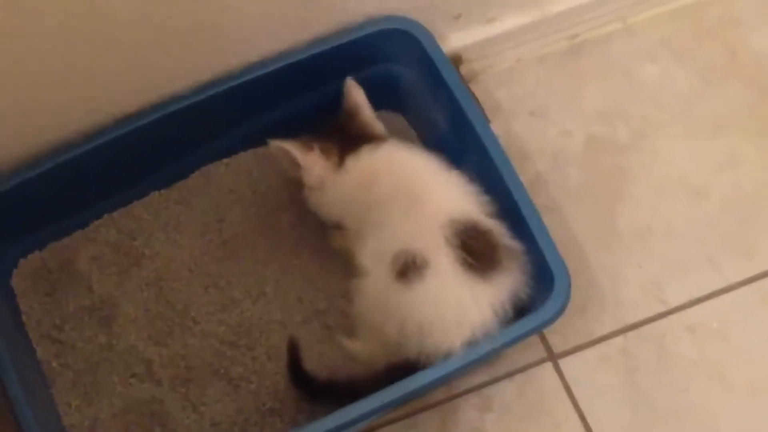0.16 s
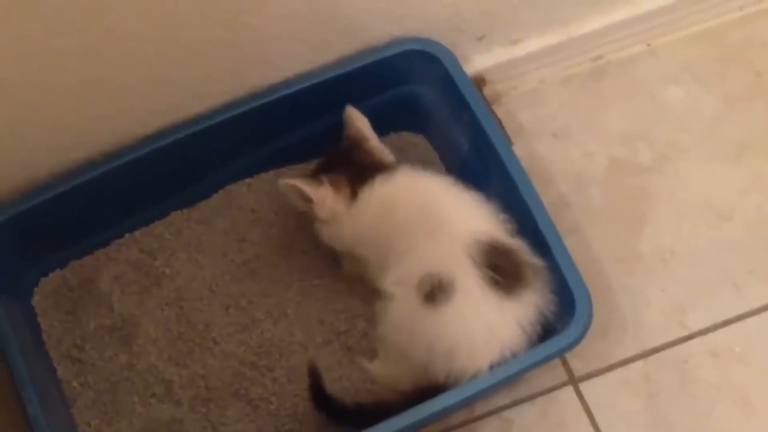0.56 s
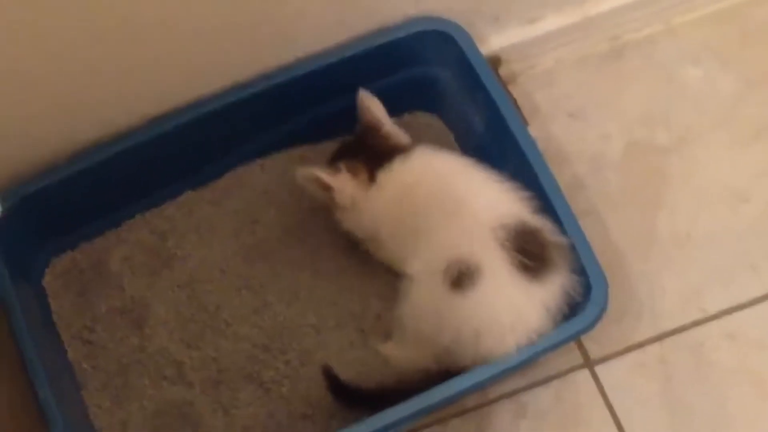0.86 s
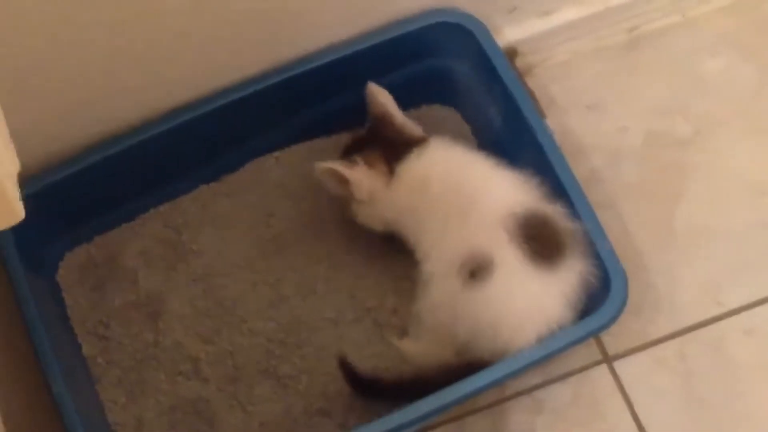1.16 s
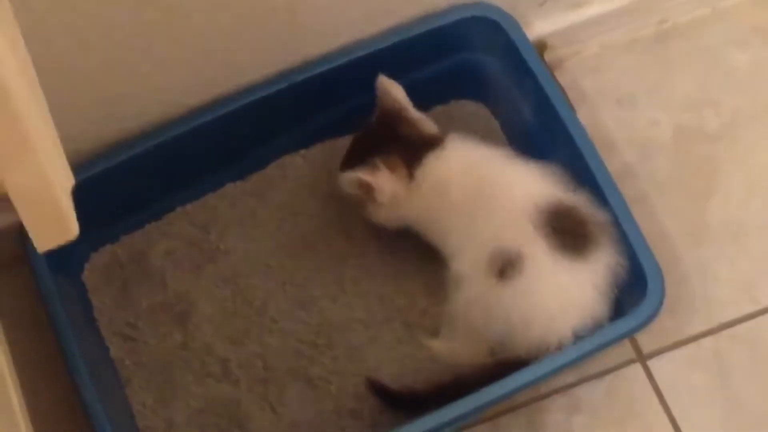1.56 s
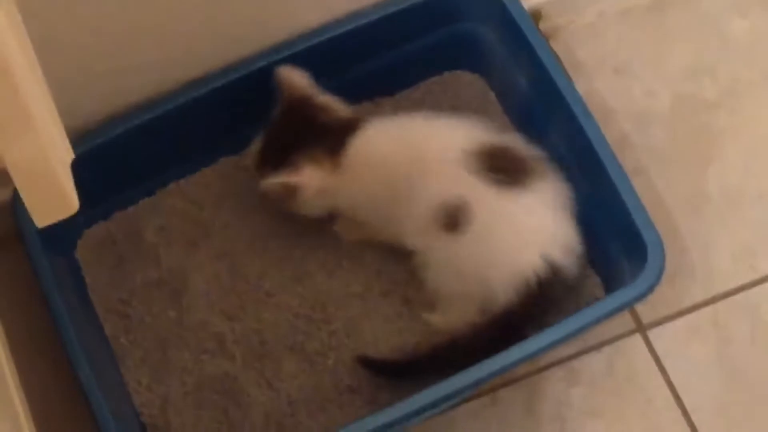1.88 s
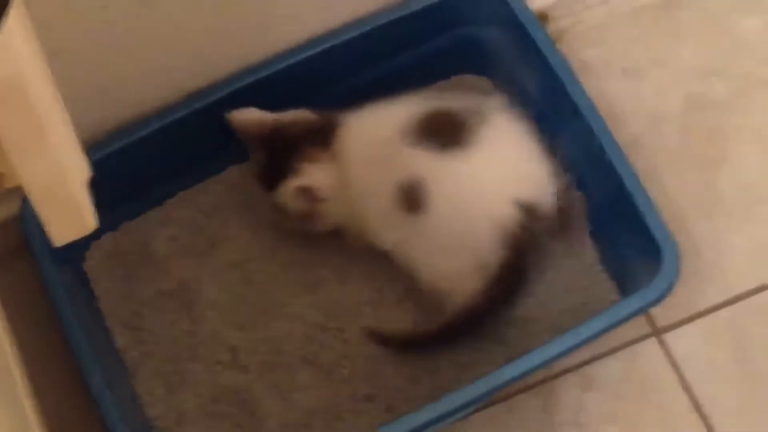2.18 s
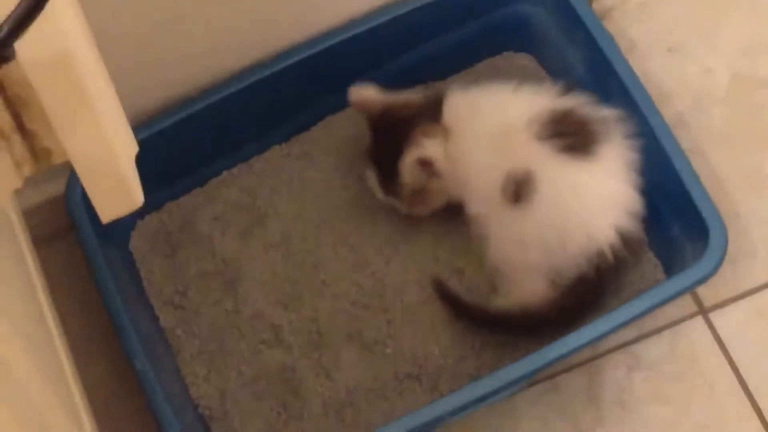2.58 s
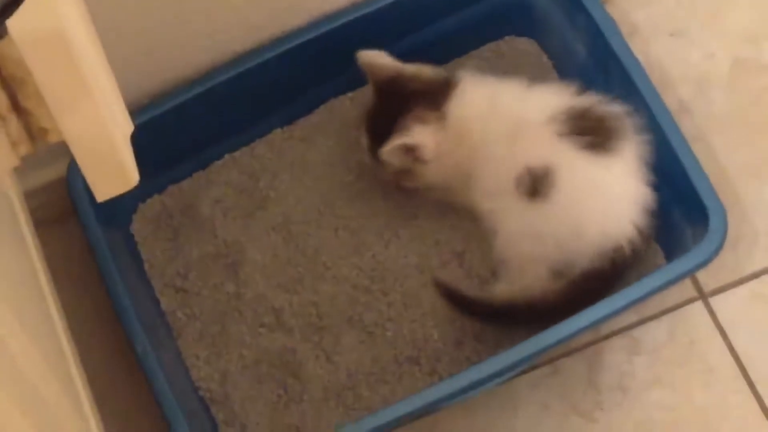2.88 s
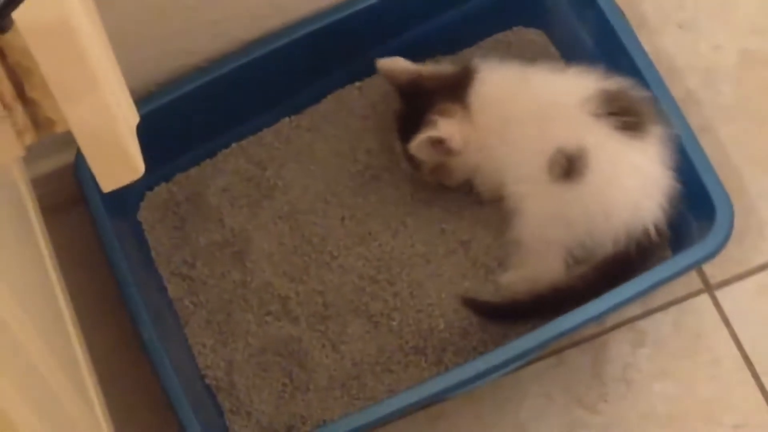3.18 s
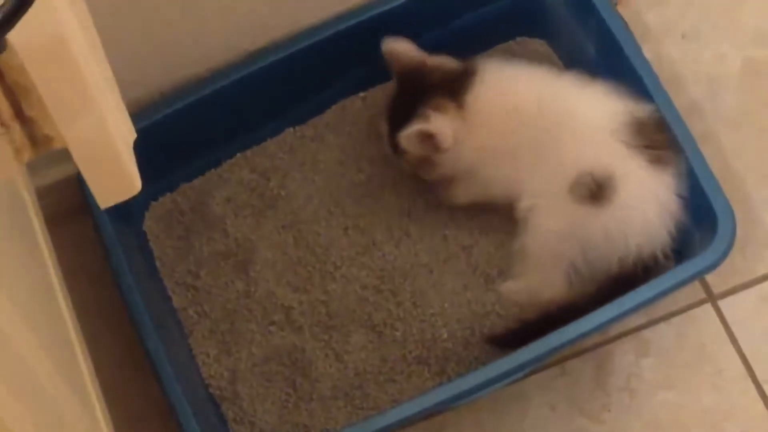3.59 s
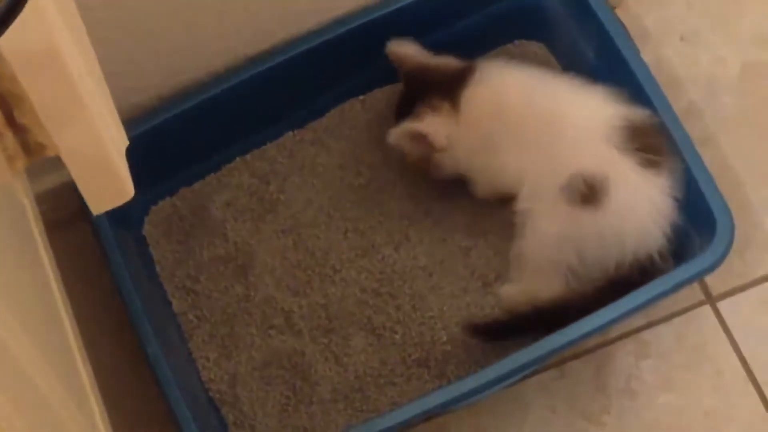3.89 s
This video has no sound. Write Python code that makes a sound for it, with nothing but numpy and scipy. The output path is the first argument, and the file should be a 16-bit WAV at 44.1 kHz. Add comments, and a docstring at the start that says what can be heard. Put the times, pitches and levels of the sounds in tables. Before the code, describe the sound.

Dry clay granules crunch and scatter under fast small paws, rattling the plastic tray. The digging stops briefly while loose litter trickles and brushes softly, then resumes with duller, more spaced strokes and a few knocks. An appliance hums low throughout; the microphone is about a metre away, with slight hiss and little reverberation.

```python
"""Kitten digging in clay litter

A kitten digs in a plastic tray on a tiled floor, heard from about a metre above.
Each paw stroke is a shower of random grain clicks, which also excite the modes of the tray;
loose grains trickle between strokes, soft swishes brush the dust, and knocks and ticks stand out.
A mains-driven appliance hums as a sine over the shaped noise of room rumble and microphone hiss."""
import sys
import numpy as np
from scipy import signal
from scipy.fft import rfft, irfft
from scipy.io import wavfile
from scipy.ndimage import uniform_filter1d

SR = 44100
rng = np.random.default_rng(int(sys.argv[2]) if len(sys.argv) > 2 else 0)


def master_out(mix):
    """Clip the mix to full scale and print it as 16-bit PCM to the path in sys.argv[1]."""
    frames = np.transpose(np.atleast_2d(mix))
    ceiling = np.clip(frames, -1, 1)
    pcm = np.round(ceiling * 32767).astype(np.int16)
    wavfile.write(sys.argv[1], SR, pcm)


N = 178119
T = np.arange(N) / SR  # time [s]

# Paw strokes; positive brightness skims the dusty top, negative digs to the tray floor:
# (time [s], relative strength [dB], brightness [dB], length [s])
PAW_STROKES = [(0.0357, -47.5, -1.5, 0.031), (0.163, -58, -4, 0.027), (0.246, -49.5, -4.5, 0.024),
               (0.3476, -58.5, -9, 0.026), (0.394, -54, 1.5, 0.013), (0.4306, -48, 2, 0.021),
               (0.526, -56.5, 1.5, 0.017), (0.5554, -59, 1, 0.018), (0.6324, -51, -1, 0.03),
               (0.786, -60, 3.5, 0.023), (0.8196, -47, -2, 0.027), (0.894, -54.5, 4, 0.021),
               (0.95, -51.5, 2.5, 0.017), (1.0216, -49.5, 3, 0.046), (1.1084, -60, -3, 0.02),
               (1.1674, -57, -1, 0.014), (1.2476, -50.5, 1, 0.054), (1.3784, -58, 5, 0.047),
               (1.435, -52.5, 3, 0.057), (1.493, -55.5, 2, .023), (1.609, -55.5, 1.5, 0.011),
               (1.683, -51, -1, .059), (1.846, -59, 3, 0.0079), (2.445, -56, -7, 0.04),
               (2.7354, -48, -6.5, 0.035), (2.8873, -59.5, -9, 0.12), (2.9654, -56, -3.5, 0.046),
               (3.2113, -49, -1, 0.049), (3.335, -54, -2.5, .021), (3.3643, -54, -3, 0.027),
               (3.4494, -55, -3, 0.013), (3.5364, -59.5, 2.5, 0.034), (3.571, -51, -2.5, 0.022),
               (3.713, -49, -5, 0.043), (3.7564, -60, 1, .03), (3.837, -58.5, 3.5, 0.018),
               (3.8995, -63, 6.5, 0.025), (3.931, -49.5, 0, 0.02)]
# Soft swishes over the dusty surface as the kitten turns:
# (time [s], relative strength [dB], brightness [dB], length [s])
SURFACE_SWISHES = [(2.206, -57, -2.5, .065), (2.275, -59, 3.5, 0.061)]
# Loose litter sliding under the body: (time [s], relative crunch level [dB])
SLIDING_LITTER = [(0.0, -60), (1.06, -56.5), (1.26, -62.5), (1.63, -55), (1.81, -67), (2.1, -64),
                  (2.38, -55), (2.53, -67.5), (2.78, -75.5), (2.9, -55.5), (3.04, -83), (3.26, -59),
                  (3.41, -59.5), (4.04, -60)]
# Colour of the clay grains by the pitch they click at: (frequency [Hz], relative level [dB])
GRAIN_COLOUR = [(900, -11.5), (1200, -9), (1500, -5.5), (2000, -1.5), (2500, -6.5), (3300, 1), (4000, 0.5),
                (5200, -2.5)]
# Colour of dust skittering on top: (frequency [Hz], relative level [dB])
DUST_COLOUR = [(4200, -17.5), (5200, 2.5), (5700, 0.5), (8000, 1), (10000, -5), (12500, -12.5),
               (15600, -12)]
# Colour of the finest dust thrown up: (frequency [Hz], relative level [dB])
SPRAY_COLOUR = [(7000, -18), (10000, 5), (13000, 5), (15600, -6)]
# Modes of the plastic tray: (frequency [Hz], width [Hz], relative level [dB])
TRAY_MODES = [(517, 57, -9.5), (595.3, 28, 0), (669.5, 23.5, -1), (827, 56, -1.5), (895, 16, -7),
              (1094, 19, -8), (1264, 24, -4.5), (1745, 74, -5), (1913, 21, -5.5), (1992, 53, -5),
              (2075, 21, -17), (2217, 32, -3.5), (2451, 42, -1.5), (2457, 44, -14), (3676, 17, -9),
              (4090, 73, -9.5)]
# Lumps and claws knocking the tray: (time [s], peak level [dB], frequency of the nearest modes [Hz])
TRAY_KNOCKS = [(0.059, -54, 1260), (.44, -51, 2500), (.562, -51, 650), (.672, -54.5, 624),
               (.87, -55.5, 595), (.905, -51.5, 1880), (1.055, -52, 600), (1.125, -59, 2415),
               (1.175, -58, 2470), (1.498, -53, 580), (1.51, -51, 910), (1.613, -55, 580), (2.74, -53, 840),
               (2.755, -47, 580), (2.76, -56, 1260), (3.24, -46, 1930), (3.34, -55, 1880),
               (3.75, -51.5, 590)]
# Single grains flicked against the wall: (time [s], peak level [dB], colour centre [Hz])
WALL_TICKS = [(0.346, -55, 4150), (0.395, -49, 4720), (0.856, -49.5, 3820), (1.4392, -46.5, 4730),
              (1.611, -60, 3400), (1.851, -53, 3620)]
# Appliance hum: (time [s], rms level [dB])
HUM_LEVEL = [(0.0, -51.5), (0.42, -50.5), (0.98, -52), (1.74, -49), (3.69, -50.5), (4.04, -51)]
# Spectrum of the room rumble: (frequency [Hz], relative level per Hz [dB])
RUMBLE_COLOUR = [(20, -20), (50, -9), (76, -5), (88, 0), (100, -8.5), (135, -1), (162, -15), (215, -5),
                 (250, -11), (275, -11.5), (300, -16.5), (420, -18), (650, -22), (900, -51)]
# Spectrum of the microphone hiss: (frequency [Hz], relative level per Hz [dB])
HISS_COLOUR = [(600, 0.5), (900, -1.5), (1500, -3), (2500, -14), (3000, -11.5), (4000, -13.5), (8000, -14),
               (15600, -17)]

GRIT_HZ = 2900  # grains clicking above it are fine grit
THUD_TOP_HZ = 1000  # modes below it belong to the floor of the tray
RISE_SHARE, SWISH_RISE_SHARE = 0.38, 0.68  # part of the length in which a stroke or swish rises
SETTLE_S, SETTLE_PER_LENGTH = 0.16, 3.25  # crunch decay by 60 dB [s], and seconds added per second of length
# Grit, fizz, thud and spray: level over the crunch [dB], and dB gained per dB of brightness
STROKE_MIX_DB, SWISH_MIX_DB = [-7.5, -11, -8, -30], [-7, -1.5, -26, -12]
BRIGHT_SLOPE = [0.85, 0.94, -0.21, 1.3]
# The same four in the trickle: level over the crunch at its middle level [dB], and dB gained per dB of crunch
TRICKLE_MID_DB = -60
TRICKLE_MIX_DB, TRICKLE_FOLLOW = [-9, -13, -5.5, -28.5], [0.75, 0.82, 0.41, .8]
HUM_HZ = 120
RUMBLE_DB, HISS_DB = -58.5, -74  # rms levels
EDGE_HZ = 15480  # upper band limit


def litter():
    """Superposition: grain clicks heard directly and through the walls of the tray."""
    crunch, grit, fizz, thud, spray = activity()
    return dust(fizz, spray) + crushed_grains(crunch, grit) + tray_rattle(crunch, thud)


def activity(grit_fade=0.65, fizz_fade=0.88, thud_fade=1.0, spray_fade=0.66):
    """Incoherent addition: powers of strokes, swishes and trickle sum in crunch, grit, fizz, thud and spray."""
    sliding_db = np.interp(T, *np.transpose(SLIDING_LITTER)) - TRICKLE_MID_DB
    mix_and_follow = zip([0, *TRICKLE_MIX_DB], [1, *TRICKLE_FOLLOW])
    trickle_db = [TRICKLE_MID_DB + over_db + follow * sliding_db for over_db, follow in mix_and_follow]
    power = gain_of(trickle_db) ** 2

    # decay times relative to the crunch
    fade = np.array([[1], [grit_fade], [fizz_fade], [thud_fade], [spray_fade]])
    moves = [(*stroke, STROKE_MIX_DB, RISE_SHARE) for stroke in PAW_STROKES]
    moves += [(*swish, SWISH_MIX_DB, SWISH_RISE_SHARE) for swish in SURFACE_SWISHES]
    for s, db, bright_db, length, base_mix_db, rise_share in moves:
        mix_db = np.add(base_mix_db, np.multiply(BRIGHT_SLOPE, bright_db))
        levels_db = db + np.append(0, mix_db)[:, None]
        start, length = round(s * SR), max(length, 2e-3)
        t = T[:N - start][:SR // 2]
        # the paw digs in smoothly, drags, then the thrown grains settle
        rise = np.sin(np.pi / 2 * np.minimum(t / (rise_share * length), 1))
        decay_s = (SETTLE_S + SETTLE_PER_LENGTH * length) * fade
        settling = gain_of(-60 * np.maximum(t - length, 0) / decay_s)
        power[:, start:start + len(t)] += (gain_of(levels_db) * rise * settling) ** 2
    return np.sqrt(power)


def crushed_grains(crunch, grit, cycles=4.18, count=14):
    """Granular excitation: each size of grain clicks at its own pitch and gives way in its own clumps."""
    out = np.zeros(N)
    for hz in np.geomspace(GRAIN_COLOUR[0][0], GRAIN_COLOUR[-1][0], count):
        drive = gain_of(-17.0) * crunch if hz < GRIT_HZ else gain_of(-12.5) * grit
        crushed = drive * clumps(.02, depth_db=2.5) * grains(per_s=900, spread_db=1.5)
        # a few cycles under a bell-shaped envelope
        t = T[:round(SR * cycles / hz)]
        click = np.sin(2 * np.pi * hz * t) * np.exp(-(t * hz / cycles * 4 - 2) ** 2)
        click = click / np.linalg.norm(click)
        out += gain_of(read(GRAIN_COLOUR, hz)) * signal.oaconvolve(crushed, click)[:N]
    return out


def dust(fizz, spray):
    """Filtered shot noise: dense clicks take the colours of skittering dust and of the finest spray."""
    skitter = fizz * clumps(0.016, depth_db=2.0) * grains(per_s=7000, spread_db=-3.0)
    thrown = spray * grains(per_s=9900, spread_db=4.5)
    skitter = gain_of(-5.5) * signal.oaconvolve(skitter, causal(DUST_COLOUR))[:N]
    return skitter + signal.oaconvolve(thrown, causal(SPRAY_COLOUR))[:N]


def tray_rattle(crunch, thud):
    """Modal resonance: larger lumps strike the plastic, each exciting a single mode."""
    out = np.zeros(N)
    for mode in TRAY_MODES:
        drive = gain_of(-10.5) * thud if mode[0] < THUD_TOP_HZ else gain_of(-17.5) * crunch
        lumps = drive * grains(per_s=90, spread_db=3.5)
        out += gain_of(mode[2]) * signal.oaconvolve(lumps, ringing([mode]))[:N]
    return out


def grains(per_s, spread_db):
    """Shot noise: clicks of random sign and moment; positive spread makes a few large, negative a few small."""
    size = gain_of(spread_db * np.minimum(rng.exponential(1, N), 4))
    sign = rng.choice([-1., 1.], N)
    struck = rng.random(N) < per_s / SR
    return evened(size * sign * struck)


def clumps(seconds, depth_db):
    """Random modulation: grains give way in uneven clumps, a quick gain of rms 1."""
    wander = uniform_filter1d(rng.standard_normal(N), max(round(seconds * SR), 2))
    return evened(gain_of(depth_db * evened(wander)))


def knocks(reach=0.21, push=0.0013):
    """Local modal excitation: a blow favours the nearest modes, with an onset softened over push seconds."""
    out = np.zeros(N)
    soft_start = 1 - np.exp(-T[:3000] / push)
    for s, db, near_hz in TRAY_KNOCKS:
        modes = [(hz, width, mode_db - 10 * (np.log(hz / near_hz) / reach) ** 2)
                 for hz, width, mode_db in TRAY_MODES]
        add(out, s, db, ringing(modes) * soft_start)
    return out


def ticks(decay_s=0.026, octaves=1.0):
    """Impact noise: a flicked grain is a snap of wide noise decaying at 60 dB per decay_s."""
    out, t = np.zeros(N), T[:512]
    bins_hz = np.fft.rfftfreq(len(t), 1 / SR) + 1
    for s, db, hz in WALL_TICKS:
        snap = rng.standard_normal(len(t)) * gain_of(-60 * t / decay_s)
        colour = gain_of(-6 * (np.log2(bins_hz / hz) / octaves) ** 2)
        add(out, s, db, irfft(rfft(snap) * colour))
    return out


def room(x, t60=0.15):
    """Reverberation: sparse, decaying echoes of random sign off the tiles and walls."""
    taps = np.zeros(SR // 3)
    at = np.arange(120, len(taps) - 20, 20)
    at = at + rng.integers(0, 20, len(at))
    taps[at] = rng.choice([-1., 1.], len(at)) * gain_of(-60 * at / SR / t60)
    taps = signal.lfilter([1], [1, -.4], taps)  # echoes are duller than the direct sound
    return signal.oaconvolve(x, taps / np.linalg.norm(taps))[:N]


def hum():
    """Magnetostriction: a magnetic buzz at twice the mains frequency."""
    db = np.interp(T, *np.transpose(HUM_LEVEL))
    return np.sqrt(2) * gain_of(db) * np.sin(2 * np.pi * (HUM_HZ * T + rng.random()))


def background():
    """Stationary noise: room rumble and microphone hiss, each with its own spectrum."""
    rumble = gain_of(RUMBLE_DB) * coloured(RUMBLE_COLOUR, patchy_db=1.35)
    return rumble + gain_of(HISS_DB) * coloured(HISS_COLOUR, patchy_db=-3.0)


def coloured(points, patchy_db):
    """Spectral shaping: random noise frames take a given spectrum with faint drifting patches."""
    frames, hz = N // 1024 + 5, np.fft.rfftfreq(4096, 1 / SR)
    real, imaginary, patches = rng.standard_normal((frames, 2049, 3)).T
    patches = uniform_filter1d(patches, size=20, axis=0)  # smooth over frequency
    patches = evened(uniform_filter1d(patches, size=4, axis=1))  # smooth over time
    level_db = read(points, hz)[:, None] + patchy_db * patches
    spectrum = (real + 1j * imaginary) * gain_of(level_db)
    return evened(signal.istft(spectrum, nperseg=4096, noverlap=3072)[1][:N])


def ringing(modes, size=3000):
    """Modal synthesis: an impulse response of energy 1 made of dying sines; wider modes die sooner."""
    t = np.arange(size) / SR
    taps = np.zeros(size)
    for k, (hz, width, db) in enumerate(modes):
        decay = np.sqrt(width) * np.exp(-np.pi * width * t)
        taps += (-1) ** k * gain_of(db) * decay * np.sin(2 * np.pi * hz * t)
    return taps / np.linalg.norm(taps)


def causal(points, size=1024):
    """Minimum phase: the Hilbert transform of log gain gives a causal response, scaled to energy 1."""
    log_gain = np.log(gain_of(read(points, abs(np.fft.fftfreq(4 * size, 1 / SR)))))
    taps = np.fft.ifft(np.exp(np.conj(signal.hilbert(log_gain)))).real[:size]
    return taps / np.linalg.norm(taps)


def read(points, hz):
    """Logarithmic frequency: interpolates a spectrum in dB, at -70 dB outside its ends."""
    f, db = np.transpose(points)
    return np.interp(np.log(hz + 1), np.log(f + 1), db, left=-70, right=-70)


def add(mix, s, db, sound):
    """Superposition: mixes a sound in at time s, scaled to a peak of db."""
    part = mix[round(s * SR):][:len(sound)]
    part += (gain_of(db) * sound / abs(sound).max())[:len(part)]


def gain_of(db):
    """Level law: decibels to amplitude."""
    return 10 ** (np.asarray(db) / 20)


def evened(x):
    """Mean power: scales to rms 1."""
    return x / np.sqrt(np.mean(x ** 2) + 1e-20)


def scene():
    """Direct and reverberant fields: digging with its echoes over hum, rumble and hiss."""
    dig = litter() + knocks() + ticks()
    return (dig + gain_of(-11) * room(dig) + hum() + background())[None]


def record(dry, dip_hz=2900, dip_q=7.5, depth=0.37):
    """Linear filtering: a narrow partial dip from the microphone housing, then an upper band limit."""
    notched = signal.lfilter(*signal.iirnotch(dip_hz, dip_q, SR), dry)
    heard = dry + depth * (notched - dry)
    low_pass = signal.firwin(511, EDGE_HZ, window=("kaiser", 9), fs=SR)
    return signal.oaconvolve(heard, low_pass[None], "same")


dry = scene()
out = record(dry)
master_out(out)
```